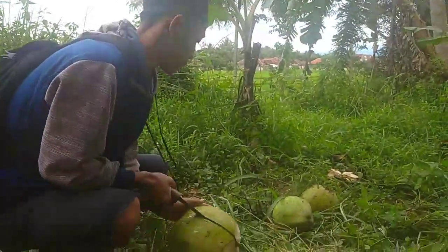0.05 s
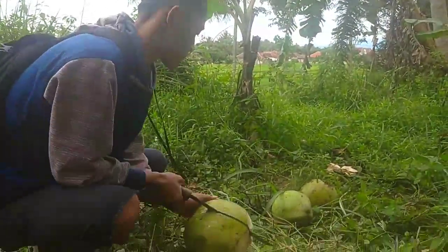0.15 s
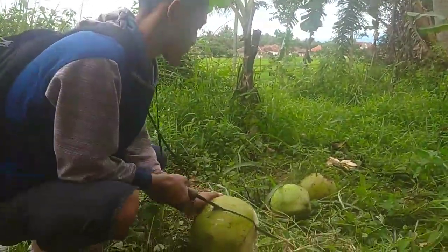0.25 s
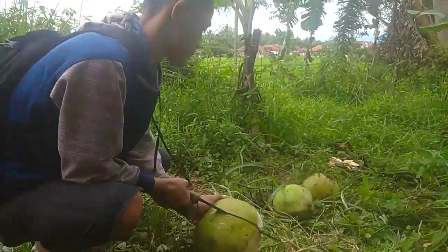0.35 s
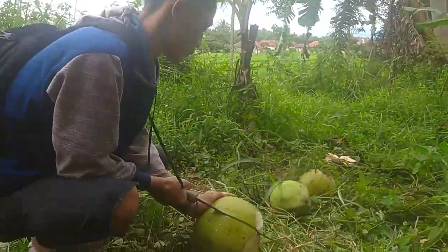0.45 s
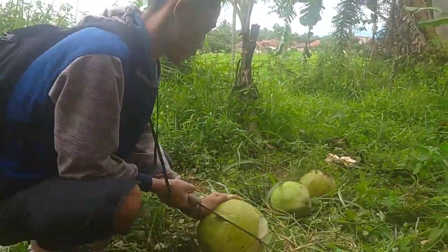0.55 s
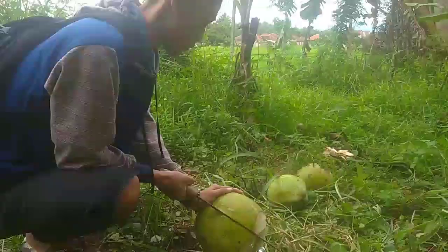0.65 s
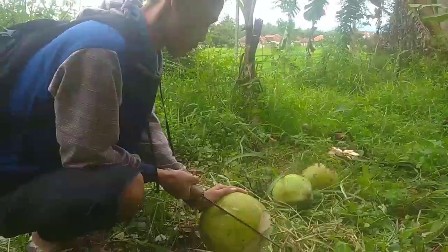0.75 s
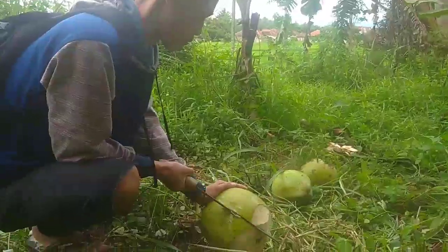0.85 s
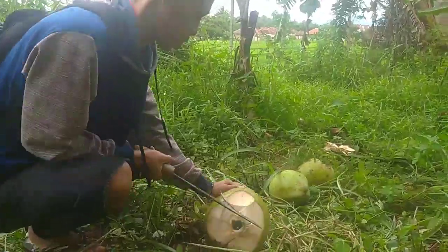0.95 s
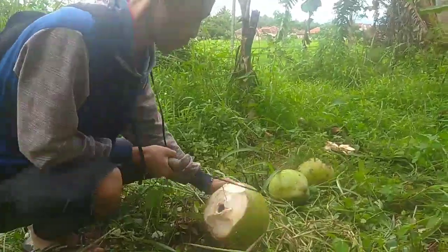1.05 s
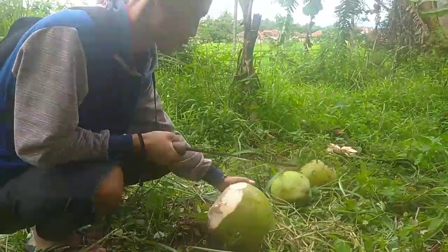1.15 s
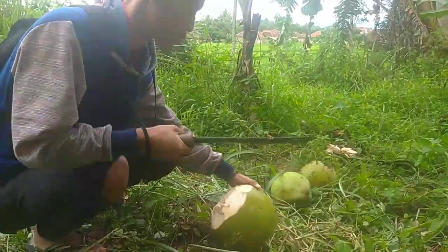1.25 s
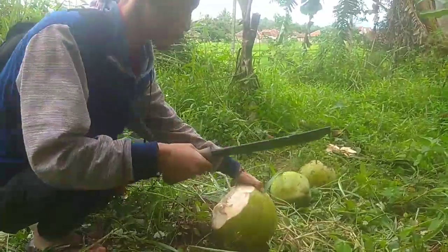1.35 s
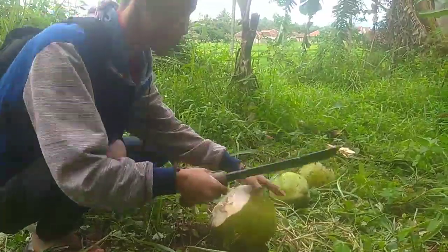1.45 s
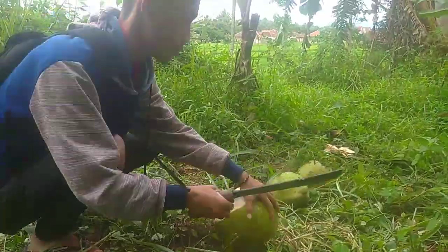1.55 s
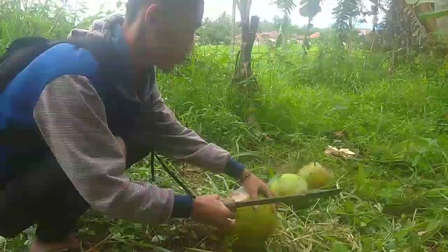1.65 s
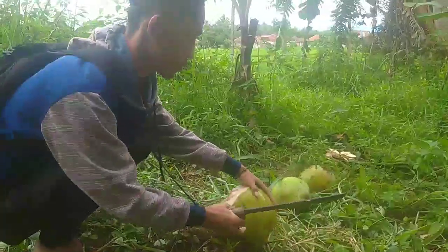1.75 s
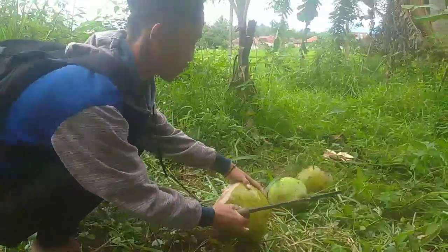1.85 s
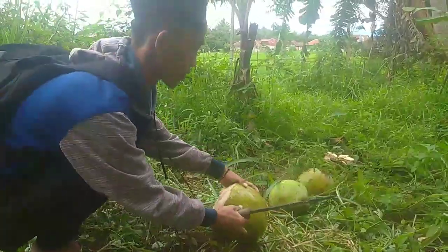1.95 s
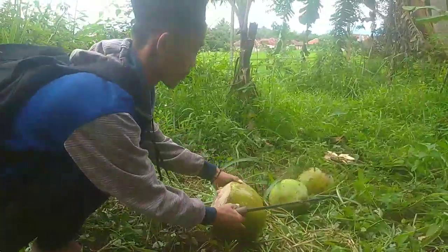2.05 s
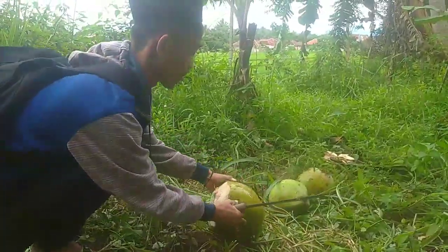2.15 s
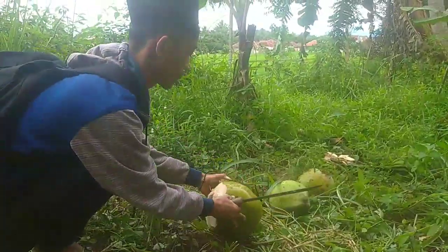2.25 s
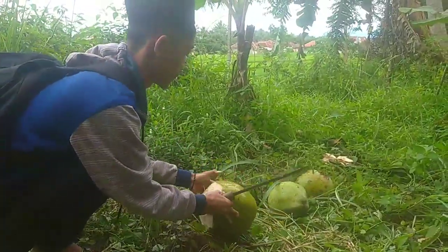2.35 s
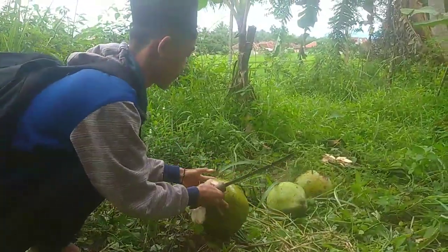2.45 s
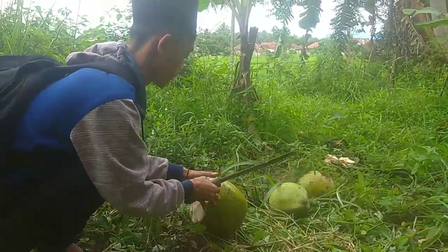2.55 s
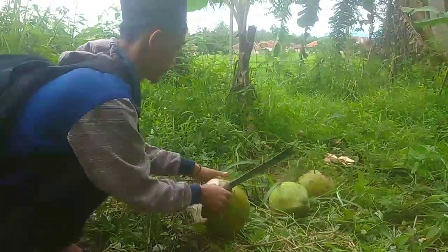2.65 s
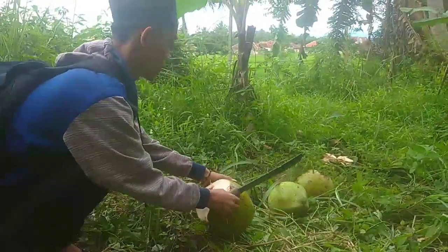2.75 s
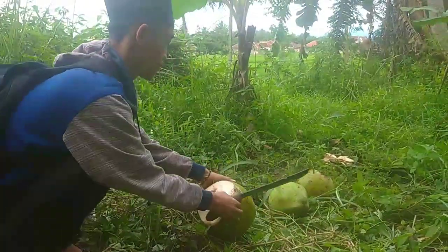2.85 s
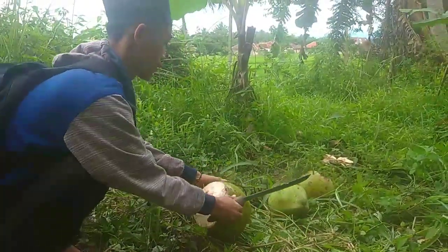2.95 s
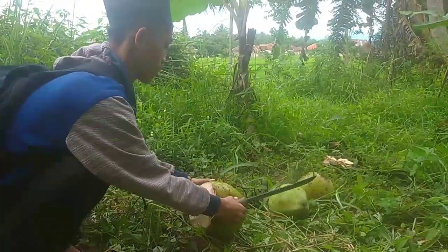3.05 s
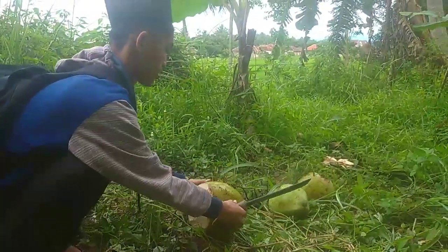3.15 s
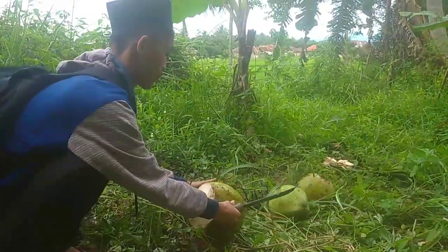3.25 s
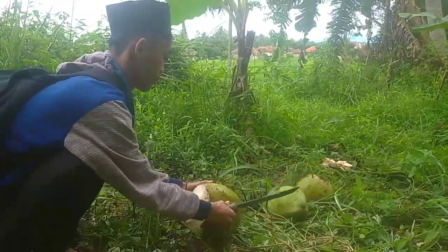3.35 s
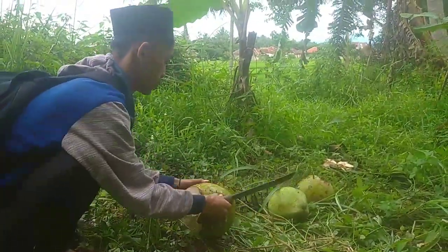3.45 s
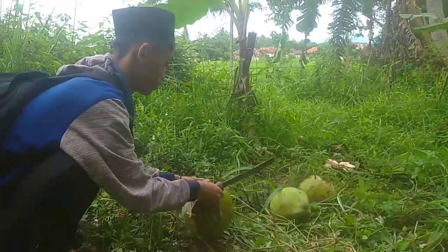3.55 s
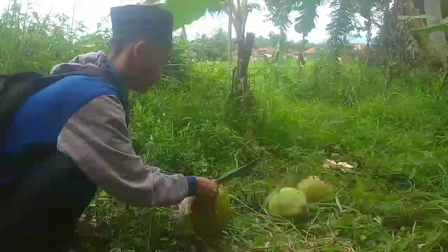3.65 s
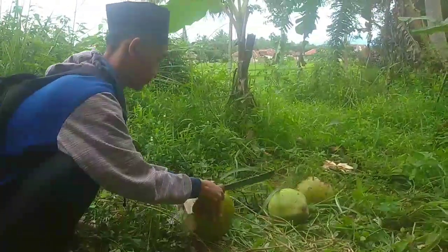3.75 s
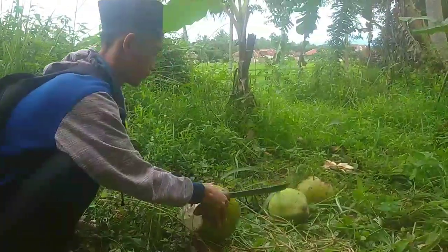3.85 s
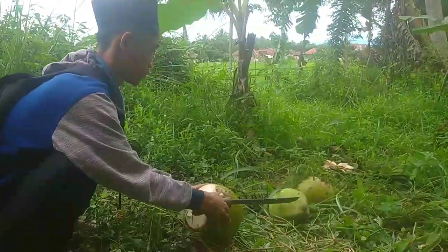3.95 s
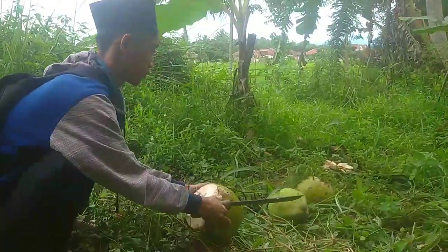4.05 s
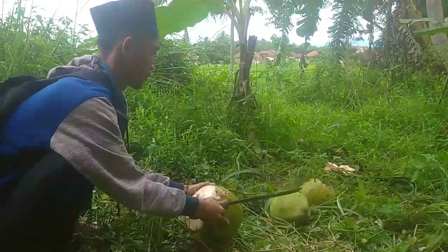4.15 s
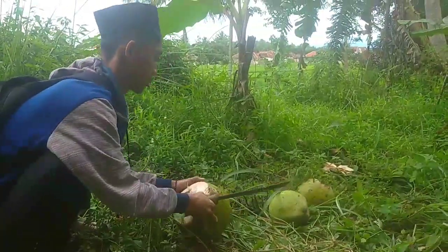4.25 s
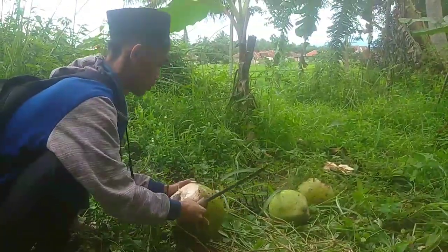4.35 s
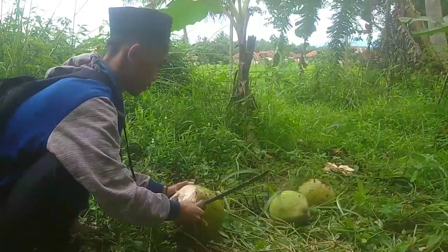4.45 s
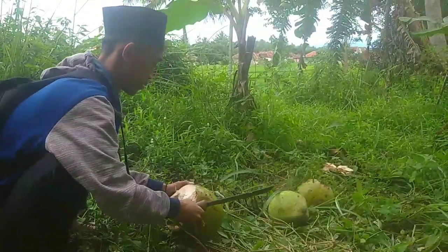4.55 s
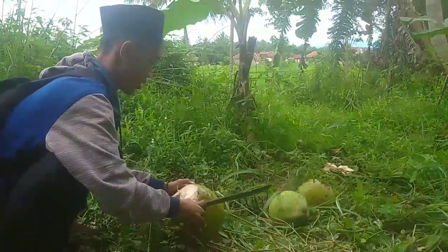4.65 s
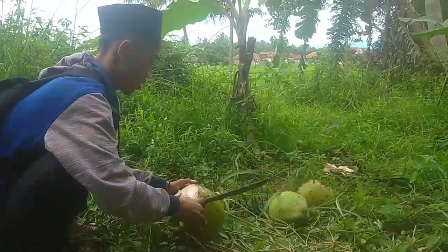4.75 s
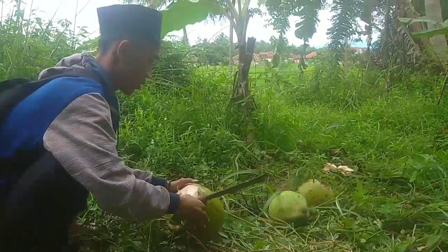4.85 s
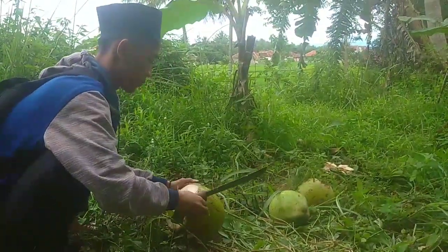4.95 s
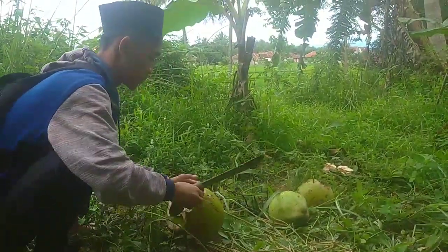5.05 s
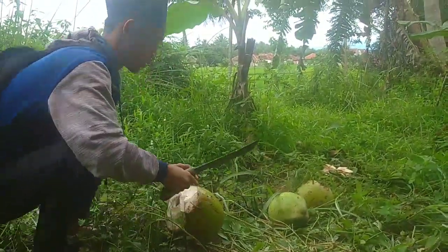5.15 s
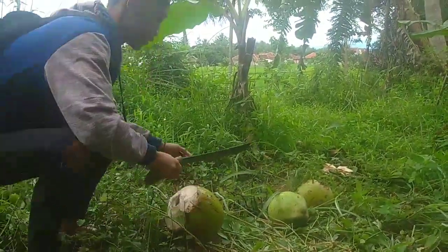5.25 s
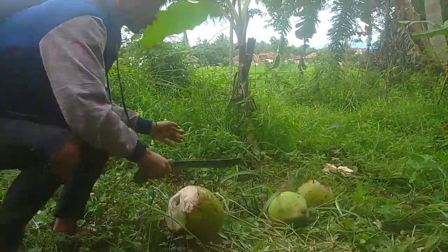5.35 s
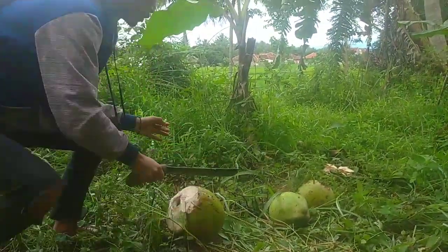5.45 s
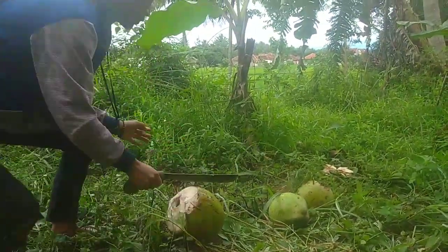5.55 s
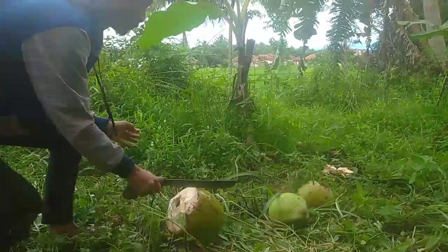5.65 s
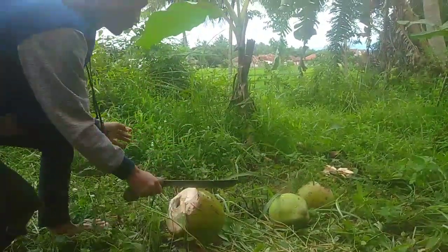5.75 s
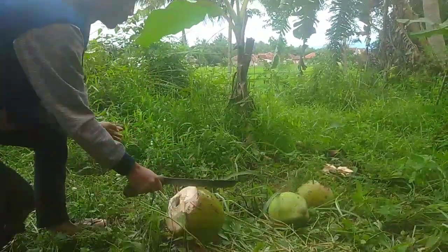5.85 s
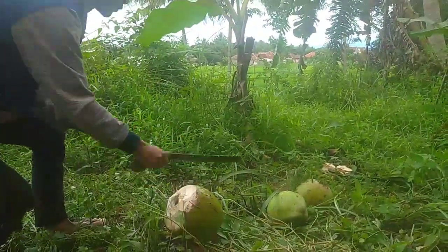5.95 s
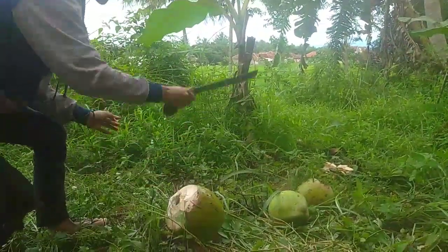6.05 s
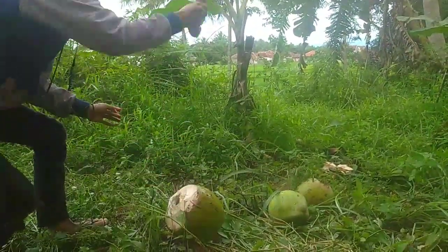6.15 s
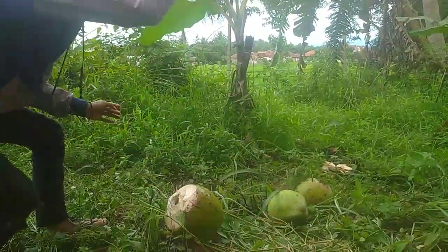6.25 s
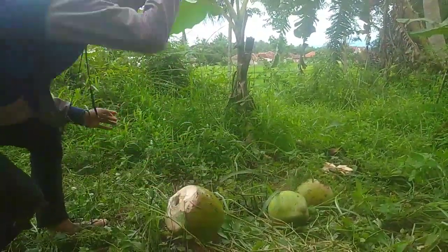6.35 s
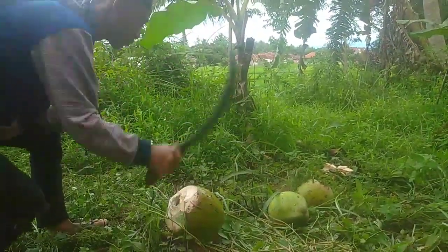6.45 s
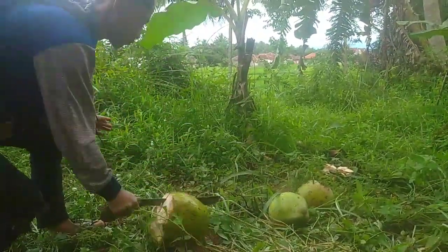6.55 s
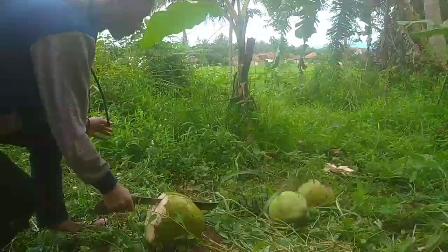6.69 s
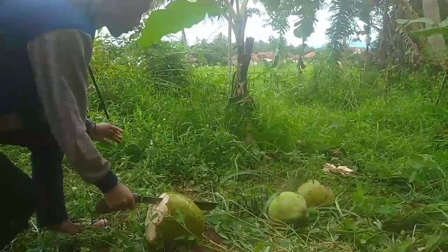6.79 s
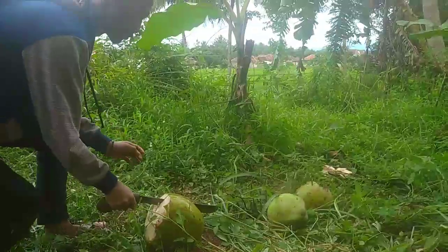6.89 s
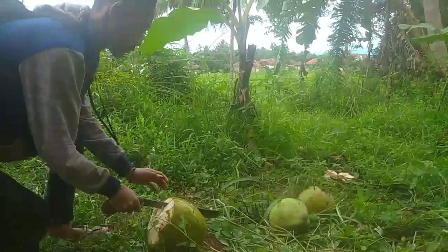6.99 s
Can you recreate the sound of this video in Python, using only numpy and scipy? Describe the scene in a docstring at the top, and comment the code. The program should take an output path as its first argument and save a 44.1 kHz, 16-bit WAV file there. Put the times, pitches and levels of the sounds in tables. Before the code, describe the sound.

In an open garden, thin, high insect song wavers quietly throughout, swelling in bouts, above a soft low rumble from a distant road. Cloth and grass rustle lightly near the microphone. At about 0.8 to 0.9 seconds a machete strikes a green coconut in quick succession: a sharp crack, a short metallic ring and a hollow boom, with wet fibres tearing and the nut bumping down on soil until just past 1.0. Soft rustling and faint ticks follow. Around 3.2 there are dull little bumps, then a very sharp dry snap at 3.7. A small scrape comes near 4.0. At 5.0 a tight cluster of bright fibre cracks breaks out, while a far motor rises slightly in pitch. From 5.4 to 5.7 clothes and grass swish, with a bump. At 6.6 a second hard chop lands with a low thud and short tearing, then insects remain until about 7 seconds.

```python
"""Insects sing all around on high, slowly swinging pitches, in bouts, over the rumble of a far road.
Clothes and grass rustle: noise made of tiny grains, as the cutter shifts and steps back.
A machete gives a green coconut two hard chops and lighter taps: the nut booms and drops back onto the
soil, the blade rings briefly (dying tones), and husk fibres snap and tear (bursts and crackling noise).
The sharpest cracks make the gain duck for a moment."""
import sys
import numpy as np
from scipy import signal
from scipy.fft import rfft, irfft, next_fast_len
from scipy.io import wavfile
from scipy.ndimage import uniform_filter1d, map_coordinates

SR = 44100
rng = np.random.default_rng(int(sys.argv[2]) if len(sys.argv) > 2 else 0)


def store_wav(level_fs):
    """Save 16-bit WAV to argv[1]."""
    pcm = np.round(np.clip(np.atleast_2d(level_fs), -1, 1) * 32767)
    wavfile.write(sys.argv[1], SR, pcm.T.astype(np.int16))


N = 309613
TOP_HZ = 14600  # nothing is heard above this pitch
TIME = np.arange(N) / SR  # seconds since the scene began
AGE = np.arange(SR // 2) / SR  # seconds since a short sound began


def amp(db):
    """Turn decibels into gain."""
    return 10 ** (np.asarray(db) / 20)


def unit(x):
    """Scale to an average strength (rms) of 1."""
    return x / np.sqrt(np.mean(x ** 2) + 1e-20)


def along(points, hz):
    """Read a curve of (Hz, value) points, with pitch on a log axis."""
    point_hz, values = np.transpose(points)
    return np.interp(np.log(hz + 1), np.log(point_hz), values)


def curves(rows):
    """Draw one value per sample for each column after the time."""
    seconds, *columns = np.transpose(rows)
    return [np.interp(TIME, seconds, column) for column in columns]


def wobble(rate):
    """A smooth random curve with this many random knots a second."""
    knots = rng.standard_normal(int(N * rate / SR) + 4)
    return map_coordinates(knots, [TIME * rate])


def since(s):
    """Seconds gone by since time s, zero before it."""
    return np.maximum(TIME - s, 0)


def fade(t60):
    """A struck thing dies away, losing 60 dB in t60 seconds."""
    return np.exp(-np.log(1000) * AGE / t60)


def add(track, s, sound):
    """Mix a sound in at time s."""
    start = round(s * SR)
    part = sound[..., :N - start]
    track[:, start:start + part.shape[-1]] += part


def filtered(x, response):
    """Multiply each frequency in x by the response there."""
    size = next_fast_len(x.shape[-1] + 8192)
    spectrum = rfft(x, size) * response(np.fft.rfftfreq(size, 1 / SR))
    return irfft(spectrum, size)[..., :x.shape[-1]]


def coloured(x, spectrum, size=2048):
    """Give x a tone colour with a filter that never sounds ahead of its cause."""
    level_db = along(spectrum, np.fft.rfftfreq(size, 1 / SR))
    # folding the cepstrum puts all of the filter's response after time zero
    cepstrum = irfft(np.log(amp(level_db)))
    cepstrum[1:size // 2] *= 2
    cepstrum[size // 2 + 1:] = 0
    response = irfft(np.exp(rfft(cepstrum)))
    return signal.fftconvolve(x, response[None], axes=1)[:, :x.shape[-1]]


def spread(pair):
    """Two unrelated signals become left and right: alike in the bass, apart in the treble."""
    # How alike left and right are. Each row: pitch in Hz, likeness from 0 to 1.
    likeness = [(100, 0.99), (500, 0.49), (1000, 0.11), (2000, 0.048), (4000, 0.029), (12000, 0.015)]
    turn = lambda hz: np.arccos(np.clip(along(likeness, hz), -1, 1)) / 2
    mid, side = filtered(pair, lambda hz: np.array([np.cos(turn(hz)), np.sin(turn(hz))]))
    return np.array([mid + side, mid - side])


def burst(spectrum, t60):
    """A dying puff of coloured noise that starts at rms 1."""
    noise = rng.standard_normal((2, len(AGE))) * fade(t60)
    puff = coloured(spread(noise), spectrum)
    return puff * np.sqrt(np.mean(fade(t60) ** 2) / np.mean(puff ** 2))


def rush(spectrum, grain_db, grain_rate):
    """Coloured noise of rms 1, clumped into tiny grains of random size."""
    grains = rng.standard_normal((2, N)) * amp(grain_db * wobble(grain_rate))
    return unit(coloured(spread(grains), spectrum))


def crackle(spectrum, rate, size_db=0.0):
    """Sparse clicks of random size, rms 1, that ring in the given colour."""
    sizes = amp(size_db * np.minimum(rng.exponential(size=N), 3))
    clicks = (rng.random(N) < rate / SR) * sizes * rng.choice([-1, 1], (2, N))
    return unit(coloured(spread(clicks), spectrum))


def ring(hz, t60, waver=0.35):
    """One dying tone whose phase wanders a little (waver in radians)."""
    knots = AGE[::256]
    drift = np.interp(AGE, knots, rng.standard_normal(len(knots)))
    return np.sin(2 * np.pi * hz * AGE + waver * drift) * fade(t60)


def song(pitch_hz, pan_db, swell, flutter_db=2.5, buzz_db=3.0):
    """One insect's buzzing tone; foliage scatters it, so it flutters differently left and right."""
    # Overtones of the song. Each row: multiple of the pitch, level in dB.
    overtones = [(1, -9), (2, -19), (3, -22.5), (4, -6)]
    phase = 2 * np.pi * np.cumsum(pitch_hz) / SR
    buzz = amp(buzz_db * wobble(120))
    pan = np.array([[pan_db], [-pan_db]]) / 2
    out = np.zeros((2, N))
    for harmonic, level_db in overtones:
        flutter = amp(flutter_db * np.array([wobble(12), wobble(14)]) + pan)
        tone = np.sin(round(harmonic) * phase + np.array([wobble(5), wobble(4.6)]))
        out += amp(level_db) * swell(harmonic * pitch_hz.mean()) * unit(buzz * flutter * tone)
    return out


def insects(quiet_db=-47.5, rise_share=.4, jitter_hz=1.98):
    """Singers' pitches climb and sag; now and then one stands out; farther ones blur into bands."""
    # Single singers. Each row: top pitch in Hz, first crest in seconds, cycle in seconds,
    # share by which the pitch falls, level in dB, left-over-right in dB.
    singers = [(3279, 1.63, 1.81, .0145, 2.5, -2), (3377, 1.55, 1.83, .016, -3, 5),
               (3312, 1.6, 1.8, .013, -9, 2), (3228, 1.7, 1.8, .015, -11, 0),
               (3055, .85, 1.05, .018, -16, 2)]
    # One insect swells out and glides down. Each row: middle in seconds, half length in seconds,
    # pitch in Hz at the middle, level in dB.
    solos = np.array([(1.251, 0.13, 3484, -3), (2.202, 0.27, 3300, 0.5), (4.054, 0.36, 3460, 5),
                      (5.616, 0.42, 3308, 3.5)])
    # The far chorus. Each row: centre in Hz, width in Hz, level in dB.
    bands = [(3254, 60, -18), (3330, 420, -14), (6580, 700, -7.5), (10200, 480, -22), (12950, 380, -12),
             (13230, 340, -6.5)]
    # The insects join in. Each row: start in seconds, length in seconds, lift in dB (before `swell`).
    bouts = [(0.598, 0.99, 2.5), (1.913, 1, 5), (3.3, 0.18, 5), (5.114, 0.43, 5.5), (6.055, 0.19, 2.5)]
    rise_s, fade_s = 0.022, 0.86  # time constants of a bout
    sag_hz_per_s, solo_jitter_hz = 190, 9

    song_db = quiet_db
    for s, length, db in bouts:
        song_db = song_db + db * (1 - np.exp(-since(s) / rise_s)) * np.exp(-since(s + length) / fade_s)
    mean_db = song_db.mean()
    # the highest overtones swell and sink the most
    swell = lambda hz: amp(mean_db + (song_db - mean_db) * hz / TOP_HZ)

    out = np.zeros((2, N))
    for top_hz, crest, cycle, fall, db, pan_db in singers:
        swing = signal.sawtooth(2 * np.pi * (TIME - crest) / cycle, np.clip(1 - rise_share, 0, 1))
        sag = (1 + swing) / 2
        pitch_hz = top_hz * (1 - fall * sag ** 1.25) + jitter_hz * wobble(90)
        out += amp(db) * song(pitch_hz, pan_db, swell)

    # solos take turns: the one nearest in time sounds
    nearest = np.argmin(np.abs(TIME - solos[:, :1]), axis=0)
    middle, half_s, solo_hz, solo_db = solos[nearest].T
    glide_hz = solo_hz - sag_hz_per_s * (TIME - middle) + solo_jitter_hz * wobble(90)
    out += amp(solo_db) * np.exp(-((TIME - middle) / half_s) ** 2) * song(glide_hz, 0, swell)

    for centre_hz, width_hz, db in bands:
        noise = spread(rng.standard_normal((2, N)))
        band = filtered(noise, lambda hz: 2 ** (-2 * ((hz - centre_hz) / width_hz) ** 2))
        out += amp(db + 1.8 * wobble(12)) * swell(centre_hz) * unit(band)
    return out


def road(rumble_db=-45, swing_db=2):
    """Far traffic is low noise; one motor, a stack of overtones, stands out as it gathers speed."""
    # The motor's course. Each row: time in seconds, pitch in Hz, level in dB.
    course = [(0, 54, -54.5), (.6, 51.43, -63), (1.2, 54.23, -54.5), (4.5, 53.54, -58.5),
              (4.85, 54.3, -47.5), (5.2, 58, -47.5), (5.55, 62.1, -48), (5.7, 62.85, -52),
              (7.02, 63.1, -61.5)]
    # Its exhaust note. Each row: multiple of the pitch, level in dB.
    exhaust = [(3, -13), (4, -0.5), (5, -9), (6, -9), (7, -10), (8, -10.5)]
    # Colour of the rumble. Each row: pitch in Hz, level in dB.
    rumble_colour = [(20, -32), (40, -22.5), (60, -10.5), (85, -1.5), (120, 1.5), (170, -3), (240, -8),
                     (330, -16), (600, -35.5), (2000, -70)]
    pitch_hz, motor_db = curves(course)
    phase = 2 * np.pi * np.cumsum(pitch_hz + 0.38 * wobble(15)) / SR
    motor = np.zeros(N)
    for harmonic, db in exhaust:
        motor += amp(db + 0.97 * wobble(6.8)) * np.sin(round(harmonic) * phase)
    rumble = amp(rumble_db + swing_db * wobble(11)) * rush(rumble_colour, grain_db=0.0, grain_rate=14)
    return amp(motor_db) * motor + rumble


def rustle(stem_db=-4, flick_db=-3):
    """Cloth rubs and grass blades flick back: grainy noise with small clicks, louder at each stroke."""
    # A sleeve or leg brushes past. Each row: middle in seconds, half length in seconds,
    # cloth level in dB, grass level in dB.
    brushes = [(0.32, 0.086, -46.5, -63), (0.684, 0.67, -58, -47), (1.13, 0.24, -65, -47),
               (1.74, 0.35, -48, -54.5), (2.432, 0.24, -46.5, -64), (2.75, 0.4, -50.5, -48.5),
               (3.483, 0.39, -54, -53), (4.375, 0.21, -87, -49), (4.703, 0.051, -46, -58),
               (4.912, 0.52, -51, -55), (5.448, 0.074, -39.5, -38.5), (5.512, 0.022, -41, -48),
               (5.57, 0.11, -43, -38.5), (5.603, 0.032, -36, -37.5), (5.648, 0.033, -40, -40),
               (5.85, 0.089, -46.5, -46)]
    # Colours of cloth and of grass. Each row: pitch in Hz, level in dB.
    cloth_colour = [(150, -24), (300, -1.5), (500, 3.5), (800, 1), (1600, -1), (2800, -1.5), (3800, -2.5),
                    (4600, -23), (5600, -54), (7000, -9.5)]
    grass_colour = [(3000, -11), (4200, -9.5), (5300, -14.5), (6900, -8.5), (7600, 1.5), (9500, -2),
                    (11000, -10.5), (12300, 1), (13400, -12), (13700, -28)]
    cloth, grass = amp(-49.5), amp(-54.5)  # the faint rustle that never stops
    for s, half_s, cloth_db, grass_db in brushes:
        stroke = np.exp(-((TIME - s) / half_s) ** 2)
        cloth = np.hypot(cloth, amp(cloth_db) * stroke)
        grass = np.hypot(grass, amp(grass_db) * stroke)
    # dry stems crackle under a brushing leg, 130 a second
    stems = amp(stem_db) * crackle(cloth_colour, rate=130)
    rubbing = unit(rush(cloth_colour, grain_db=-1.3, grain_rate=140) + stems)
    # brushed grass blades flick back, 260 a second
    flicks = amp(flick_db) * crackle(grass_colour, rate=260)
    flicking = unit(rush(grass_colour, grain_db=-0.5, grain_rate=990) + flicks)
    return cloth * amp(1.4 * wobble(21.044)) * rubbing + grass * amp(2.6 * wobble(40)) * flicking


def chops(push_s=0.0011, swell_cycles=2.76, blade_t60=.1):
    """Each blow cracks the skin, rings nut and blade, and shoves the nut into the soil."""
    # Blade or ground meets nut. Each row: start in seconds, crack level in dB, crack t60 in seconds,
    # nut level in dB, nut pitch ratio, dulling in dB per octave, blade level in dB, blade pitch in Hz,
    # ground push in dB.
    blows = [(0.753, -35.5, 0.14, -47, 0.8, -6, -40.5, 1706, -74),
             (0.824, -17, 0.015, -33, 1.02, 0, -24, 1770, -60),
             (0.9127, -18, 0.027, -26.5, 0.93, -3, -26, 1810, -60),
             (0.923, -15, 0.015, -45, 1.3, 3, -27.5, 2320, -60),
             (0.9258, -12, 0.027, -9, 1.01, 2.5, -17.5, 1700, -50),
             (1.0077, -45, .02, -19.5, 1, 19, -55, 1720, -60),
             (6.594, -14, 0.015, -33, 1.17, 15, -24, 1868, -16),
             (6.597, -5, 0.0051, -22, 1.21, 13, -18, 2128, -14.5)]
    # Tones of the hollow nut. Each row: pitch in Hz (before the ratio), level in dB, t60 in seconds.
    nut_tones = [(272.4, 0, 0.22), (473, 4, 0.069), (534, -1.5, 0.086), (688, -0.5, 0.064),
                 (750, 8.5, 0.051), (840, -1.5, 0.06), (1068, -11, 0.12), (1317, -17.5, 0.23)]
    # Colour of the crack. Each row: pitch in Hz, level in dB.
    crack_colour = [(60, -16.5), (250, 3.5), (500, -5), (1100, 0.5), (1800, -3), (3400, 1.5), (4900, -17),
                    (6500, -17), (8200, -11.5), (11000, -12), (13300, -10), (14500, -35)]
    out = np.zeros((2, N))
    u = AGE / push_s
    push = (1 - u) * np.exp(-u)
    for s, crack_db, crack_t60, nut_db, pitch, dull_db, blade_db, blade_hz, push_db in blows:
        nut = np.zeros(len(AGE))
        for hz, db, t60 in nut_tones:
            # the soft husk cushions the blow: each tone takes a few cycles to build up,
            # and a soft contact spares the high ones
            build_up = 1 - np.exp(-(AGE * hz / swell_cycles) ** 2)
            level = amp(db - dull_db * np.log2(hz / nut_tones[0][0]))
            nut += level * ring(hz * pitch, t60, waver=0.028) * build_up
        blade = ring(blade_hz, blade_t60, waver=0.34)
        crack = amp(crack_db) * burst(crack_colour, crack_t60)
        add(out, s, crack + amp(nut_db) * nut + amp(blade_db) * blade + amp(push_db) * push)
    return out


def tears(attack_s=0.0094, sag_db_per_s=65, bundle_db=1.2, split_db=-1):
    """Wet fibres tear in a dense crackle that opens at once and eases as the blade slows."""
    # The blade wedges the husk apart or scrapes it. Each row: start in seconds, level in dB,
    # length in seconds, t60 in seconds after it.
    pulls = [(0.809, -39.5, 0.0073, 0.83), (0.909, -25, 0.061, 0.21), (0.986, -31, 0.049, 0.2),
             (3.974, -35.5, 0.0075, 0.061), (4.864, -40, 0.012, 0.045), (4.999, -29.5, 0.013, 0.13),
             (6.602, -31, 0.052, 0.67), (6.655, -42, 0.015, 0.18)]
    # Colour of the husk. Each row: pitch in Hz, level in dB.
    husk_colour = [(100, -15), (300, -8), (900, 2), (2200, 3), (3600, 1.5), (4900, -13), (6500, -8),
                   (8200, 0), (10500, -11.5), (13000, -11), (14000, -46)]
    tearing = np.zeros(N)
    for s, db, length, t60 in pulls:
        easing = amp(db - sag_db_per_s * np.minimum(since(s), length))
        opening = 1 - np.exp(-since(s) / attack_s)
        tearing += easing * opening * np.exp(-np.log(1000) * since(s + length) / t60)
    # fibres give way in bundles, so the tear is uneven
    bundles = unit(amp(bundle_db * wobble(140)))
    # single fibres stand out, 520 a second
    splits = amp(split_db) * crackle(husk_colour, rate=520, size_db=1.6)
    return tearing * bundles * unit(rush(husk_colour, grain_db=0.0, grain_rate=820) + splits)


def handling(scuff_db=-7, thud_db=-3, soft_s=0.00093):
    """Small hard ticks and soft bumps on the ground: a dying tone plus a puff of noise each."""
    # Light ticks of blade and husk chips. Each row: start in seconds, level in dB, pitch in Hz,
    # t60 in seconds.
    ticks = [(0.825, -21.5, 1400, 0.019), (.838, -29, 3000, 0.014), (.927, -17, 5950, 0.0059),
             (1.012, -27.5, 1390, 0.06), (1.464, -39, 1050, 0.053), (3.159, -36, 1640, .018),
             (3.194, -42, 1070, 0.025), (3.211, -45, 1140, 0.017), (3.692, -37, 1330, 0.092),
             (3.733, -22.5, 1370, 0.045), (3.7332, -27.5, 1710, 0.028), (4.254, -38, 960, 0.02),
             (4.869, -32, 2920, .009), (5.0098, -26, 1600, .007), (5.01, -22, 4260, 0.0056),
             (5.0123, -27, 2840, 0.0079), (5.02, -35, 1570, 0.014), (5.029, -25, 2900, 0.025),
             (5.039, -35, 1380, .03), (5.062, -40, 1290, 0.05), (5.6367, -34, 1130, .014),
             (5.637, -28, 2744, .018), (6.628, -29.5, 2900, .015), (6.64, -31.5, 2110, 0.13),
             (6.667, -26, 1900, .015), (6.678, -29, 1120, 0.021), (6.688, -31, 2170, .015)]
    # Dull bumps of the nut and of a foot on the ground. Each row: start in seconds, level in dB,
    # t60 in seconds, main pitch in Hz.
    bumps = [(0.8255, -24.5, 0.041, 510), (.9365, -11, 0.051, 776), (3.191, -28, 0.043, 440),
             (3.207, -32, 0.066, 390), (3.4392, -33.5, 0.053, 430), (5.454, -39, 0.042, 790),
             (5.515, -35, 0.055, 1100), (5.614, -31.5, 0.035, 490), (5.6367, -18.5, 0.022, 710),
             (5.645, -35, 0.056, 374), (6.5894, -20, 0.05, 237), (6.5962, -11.5, 0.017, 1050),
             (6.642, -25.5, 0.064, 322), (6.672, -27.5, 0.043, 643)]
    # Colours of chips and of soil. Each row: pitch in Hz, level in dB.
    chip_colour = [(300, -18), (800, -5), (1400, 4.5), (3500, 1), (4800, -13.5), (9000, 9), (14000, -48)]
    soil_colour = [(60, -71), (220, -9), (360, 8.5), (550, -2.5), (780, -2.5), (1200, -3), (3000, -11),
                   (5000, -43), (8000, -15), (14000, -53)]
    out = np.zeros((2, N))
    for s, db, hz, t60 in ticks:
        tick = ring(hz, t60, waver=1.0) + amp(scuff_db) * burst(chip_colour, t60)
        add(out, s, amp(db) * tick)
    for s, db, t60, hz in bumps:
        thud = ring(hz, t60, waver=0.99) + amp(thud_db) * burst(soil_colour, t60)
        add(out, s, amp(db) * thud * (1 - np.exp(-AGE / soft_s)))
    return out


def snaps(pan_db=-2.5, scatter=.025, attack_s=.0001):
    """A thick fibre snaps with a ping and takes two neighbours along, ever slower and weaker."""
    # Husk fibres snap. Each row: start in seconds, level in dB, t60 of the noise in seconds.
    breaks = [(.922, -21, .01), (0.9273, -18, 0.007), (0.9993, -24, 0.02), (1.0145, -27, 0.012),
              (1.03, -26.5, 0.027), (3.6885, -4, 0.0046), (3.6962, -21, 0.0072), (3.7342, -26, 0.006),
              (3.7555, -30, 0.035), (5.0093, -17, 0.0036), (5.0104, -10.5, 0.0045), (5.0123, -11, 0.011),
              (5.0134, -18, .004), (5.0161, -22, .004), (5.0202, -17, .007), (5.0285, -29, .012),
              (6.5973, -13.5, 0.0077)]
    # A fibre pings for an instant. Each row: typical pitch in Hz, level in dB, t60 in seconds.
    pings = [(7530, -5.5, 0.01), (8820, 1, .006)]
    # Colour of a snap. Each row: pitch in Hz, level in dB.
    fibre_colour = [(200, -79), (1200, -14), (3000, -8.5), (4200, -7.5), (5200, -3), (6300, -8),
                    (7500, 1.5), (8100, 7.5), (9200, 2), (10200, -5), (11300, -5), (13300, -20),
                    (14500, -31)]
    first_gap_s, slowing, loss_db = .0031, 1.5, 10.5  # first gap, each gap over the last, first drop
    place = amp(np.array([[pan_db], [-pan_db]]) / 2)  # a little to the right
    out = np.zeros((2, N))
    for s, db, t60 in breaks:
        for k in range(3):
            ping = np.zeros(len(AGE))
            for hz, level_db, life in pings:
                # pitch differs from fibre to fibre
                fibre_hz = hz * np.exp(scatter * rng.standard_normal())
                ping += amp(level_db) * ring(fibre_hz, life)
            snap = (ping + burst(fibre_colour, t60)) * (1 - np.exp(-AGE / attack_s))
            add(out, s, amp(db - loss_db * np.sqrt(k)) * place * snap)
            s = s + first_gap_s * slowing ** k
    return out


def garden(x):
    """Plants and ground scatter the sound: a short tail of noise that dies at its own pace per pitch."""
    # How long the scatter lasts. Each row: pitch in Hz, t60 in seconds.
    tail_t60 = [(200, 0.016), (2000, 0.27), (10000, 0.1)]
    hz, t, z = signal.stft(rng.standard_normal((2, SR // 2)), SR, nperseg=256)
    dying = np.exp(-np.log(1000) * t / along(tail_t60, hz)[:, None])
    tail = signal.istft(z * dying, SR, nperseg=256)[1]
    return signal.fftconvolve(x, tail / np.linalg.norm(tail[0]), axes=1)[:, :N]


def gain_control(x, sense_hz=2400, threshold_db=-13, most_db=3, recover_db_per_s=3.5, attack_s=0.058):
    """A sharp crack turns the gain down; it creeps back within a second or so."""
    sensed = filtered(x, lambda hz: hz > sense_hz)
    power = np.abs(uniform_filter1d(np.mean(sensed ** 2, axis=0), size=64))
    excess_db = np.clip(10 * np.log10(power + 1e-12) - threshold_db, 0, most_db)
    # hold the deepest cut so far, let go at a steady rate
    recovered_db = recover_db_per_s * TIME
    cut_db = np.maximum.accumulate(excess_db + recovered_db) - recovered_db
    keep = np.exp(-1 / (attack_s * SR))
    return x * amp(-signal.lfilter([1 - keep], [1, -keep], cut_db))


def scene(echo_db=-17):
    """Insects, road and rustle around the work close by, which the garden scatters."""
    surroundings = insects() + road() + rustle()
    work = chops() + tears() + handling() + snaps()
    return surroundings + work + amp(echo_db) * garden(work)


def record(dry, edge_db=-26):
    """Tilt left against right, drop the top treble, duck at cracks, stop peaks, end the band steeply."""
    # Left hears more bass and treble. Each row: pitch in Hz, left-over-right in dB.
    left_lean = [(60, 6), (300, 6.5), (600, 0), (1200, -0.5), (4000, 1.5), (6600, -1), (8500, 6),
                 (11000, 7.5), (13500, 4.5)]
    lean = lambda hz: amp(np.array([along(left_lean, hz), -along(left_lean, hz)]) / 2)
    edge = lambda hz: amp(edge_db * np.interp(hz, [13500, 13680, TOP_HZ], [0, 1, 1.3]))
    channels = gain_control(filtered(dry, lambda hz: lean(hz) * edge(hz)))
    return filtered(np.clip(channels, -1, 1), lambda hz: hz < TOP_HZ)


dry = scene()
out = record(dry)
store_wav(out)
```